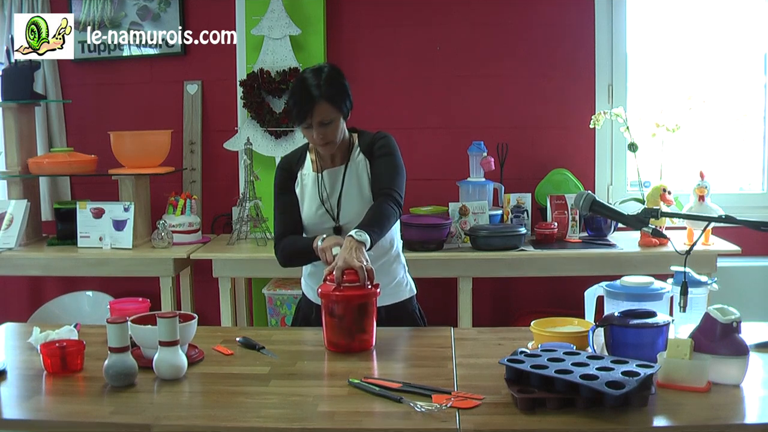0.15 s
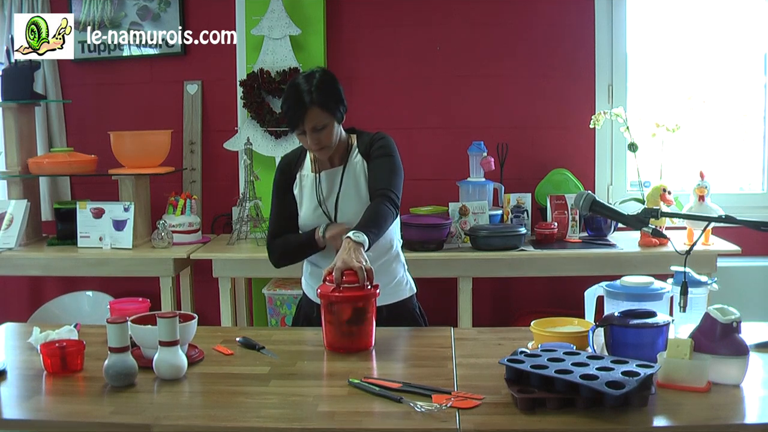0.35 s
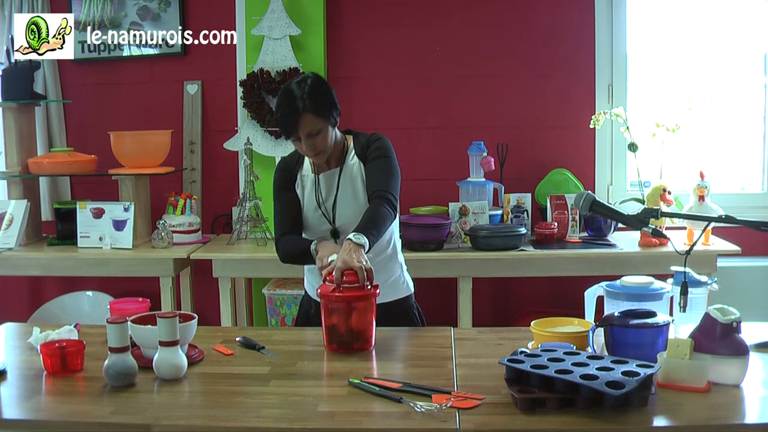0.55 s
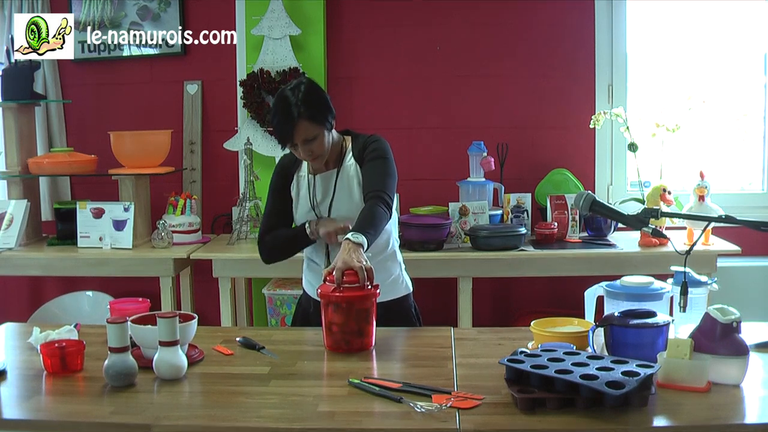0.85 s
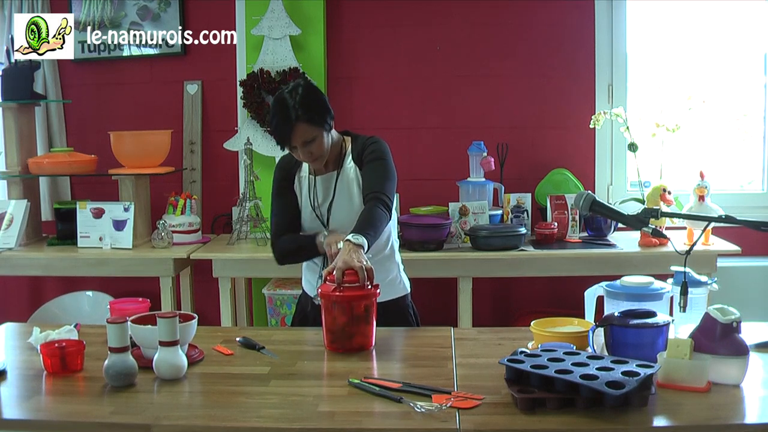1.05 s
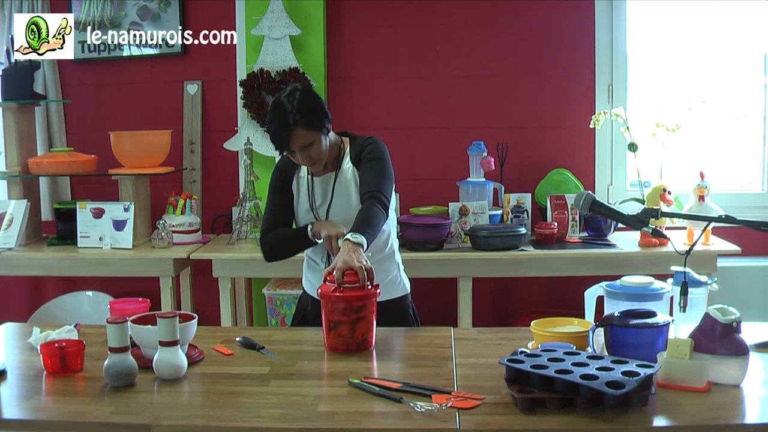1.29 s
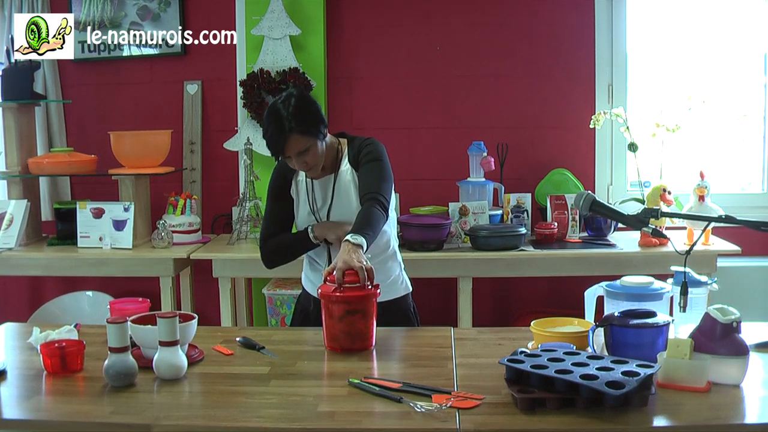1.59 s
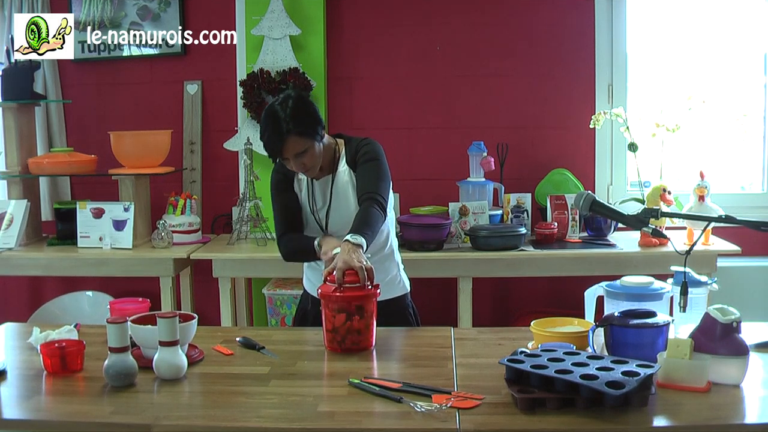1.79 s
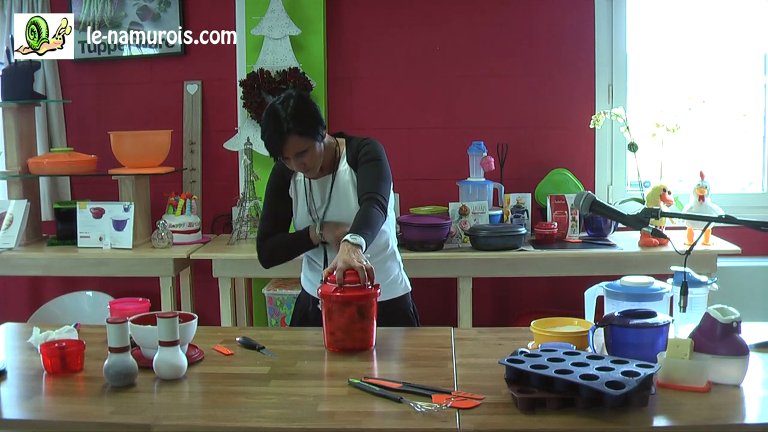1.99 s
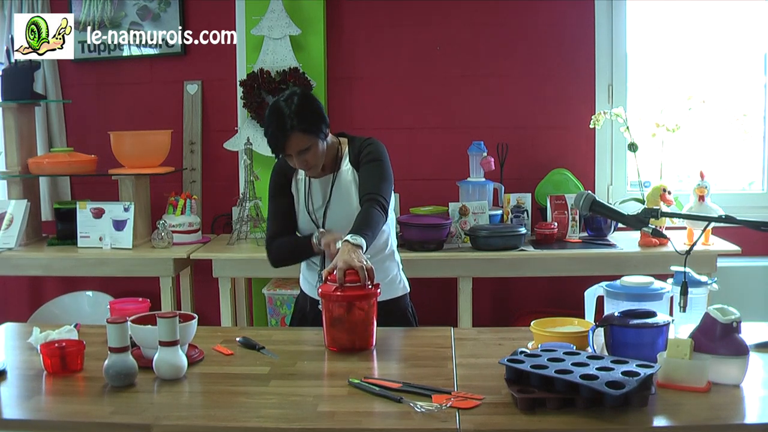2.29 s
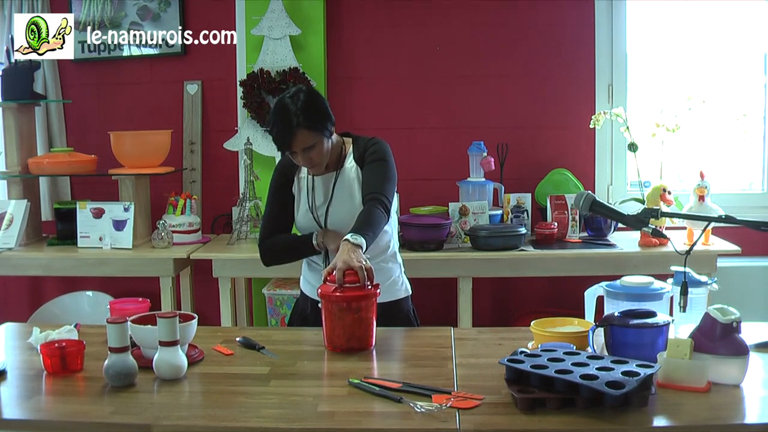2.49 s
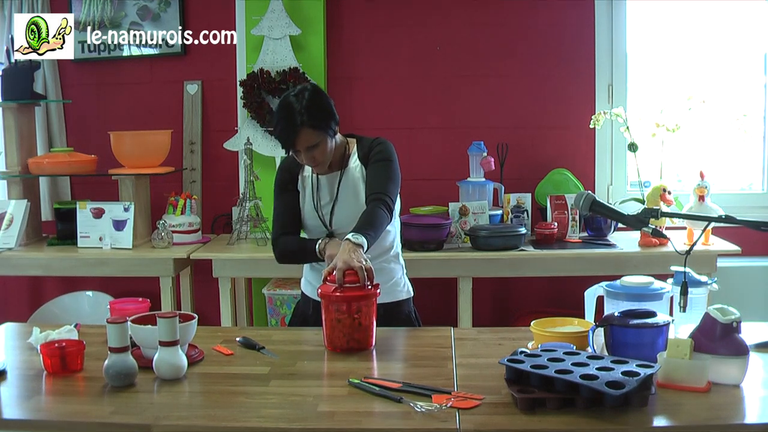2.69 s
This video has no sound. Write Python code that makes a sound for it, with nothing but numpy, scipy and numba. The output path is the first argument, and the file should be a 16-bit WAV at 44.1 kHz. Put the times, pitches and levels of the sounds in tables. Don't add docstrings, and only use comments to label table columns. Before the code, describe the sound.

A hand-pulled food chopper is tugged quickly about seven times; vegetable pieces drum on the plastic bowl, the spring ratchet rattles the cord back and the handle clacks, in a hard, echoing room a few metres away.

```python
import sys
import numpy as np
from scipy import signal
from scipy.io import wavfile
from scipy.ndimage import uniform_filter1d
from numba import njit

SR = 44100
rng = np.random.default_rng(int(sys.argv[2]) if len(sys.argv) > 2 else 0)


def undo_db(level):
    steps = np.asarray(level, float) / 20
    return 10 ** steps


def file_out(sig):
    cols = np.atleast_2d(sig).T
    lim = np.clip(cols, -1, 1)
    pcm = np.round(lim * 32767).astype(np.int16)
    wavfile.write(sys.argv[1], SR, pcm)


N = 125685

# (start [s], fastest [s], end [s])
PULL_TIMES = [(.158, .17, .24), (.25, .37, .51), (.695, .81, .885), (1.12, 1.2, 1.283), (1.558, 1.63, 1.71),
              (1.948, 2.03, 2.1), (2.345, 2.425, 2.495)]
# (level [dB], brightness [dB per octave], drum pitch [Hz], drum level [dB], rim level [dB])
PULL_SOUNDS = [
    (-30.5, 0.6, 400, -40, -55),
    (-24.5, 0.8, 420, -36, -46),
    (-24.5, 1.9, 600, -34, -41),
    (-25.5, 1.9, 660, -36, -41),
    (-25.5, 0.9, 700, -33, -39),
    (-26.5, -1.5, 600, -34, -42),
    (-29.5, -0.9, 830, -28, -38),
]
# (start [s], fastest [s], end [s])
REWIND_TIMES = [(.497, .57, .665), (.902, .97, 1.085), (1.289, 1.3, 1.375), (1.362, 1.41, 1.51),
                (1.72, 1.78, 1.9), (2.119, 2.19, 2.3), (2.522, 2.535, 2.625), (2.6, 2.77, 2.95),
                (.12, .14, .17), (-.1, .01, .09)]
# (level [dB], loose pieces [dB], rattle pitch [Hz], rattle level [dB], sizzle [dB])
REWIND_SOUNDS = [
    (-35.5, 2, 1800, -44, -7),
    (-30, -5, 1400, -38, 0),
    (-34, -5.5, 1300, -41, 1),
    (-32, -4.5, 1900, -40, -1),
    (-30.5, -3, 1300, -35, 1),
    (-30.5, -5.5, 2050, -37, 2),
    (-40.5, -12, 4950, -41, -1),
    (-53.5, 3.5, 1300, -58, -10),
    (-50.5, 3, 2000, -50, -10),
    (-60.5, 4, 400, -62, 0),
]
PULL_RISE, PULL_FALL = 0.28, 0.5
HITS_PER_S = 700


def level(x, db):
    return x * undo_db(db) / np.sqrt(np.mean(x ** 2))


def peak(x):
    return x / np.abs(x).max()


def place(out, s, db, x):
    start = int(s * SR)
    out[start:start + len(x)] += undo_db(db) * x


def butter(x, order, hz, kind):
    return signal.sosfilt(signal.butter(order, hz, kind, fs=SR, output="sos"), x)


def band(x, hz, width):
    return signal.lfilter(*signal.iirpeak(min(hz, .45 * SR), hz / width, fs=SR), x)


def moving(x, hz, width):
    turn = np.exp(2j * np.pi * np.cumsum(hz * np.ones(N)) / SR)
    centred = butter(x / turn, 2, width / 2, "low")
    return level((centred * turn).real, 0)


def ring(x, hz, t60):
    p = np.exp(2j * np.pi * hz / SR - np.log(1000) / (t60 * SR))
    return signal.lfilter([1], [1, -p], x).imag


def read(table, hz):
    table_hz, table_db = np.transpose(table)
    return np.interp(np.log(hz), np.log(table_hz), table_db)


def walk(rate):
    k = int(SR / rate)
    steps = np.repeat(rng.standard_normal(N // k + 1), k)
    return 1.3 * uniform_filter1d(uniform_filter1d(steps, k), k)[:N]


def clicks(rate, spread_db):
    when, side, size = rng.random((3, N))
    strength = np.sign(side - .5) * undo_db(-spread_db * np.log(size + .03))
    return level((when < rate / SR) * strength, 0)


def swell(start, top, end, rise, fall):
    t = np.arange(N) / SR
    up, down = (t - start) / (top - start), (end - t) / (end - top)
    return np.where(t < top, np.clip(up, 0, 1) ** rise, np.clip(down, 0, 1) ** fall)


def grains(colour, body, body_db, rate, spread_db):
    shared = undo_db(-1.5) * clicks(rate / 4, spread_db)
    half = 2 ** .25
    out = []
    for hz in 170 * 2 ** np.arange(0, 6, .5):
        hit = shared + clicks(rate * (hz / 1000) ** .5, spread_db)
        near = 0
        for f, width, db in body:
            if 1 / half <= f / hz < half:
                near = near + undo_db(db) * band(band(hit, f, 1.5 * width), f, 1.5 * width)
        direct = butter(hit, 2, [hz / half, hz * half], "band")
        out.append((hz, undo_db(read(colour, hz)) * direct + undo_db(body_db) * near))
    return out


def pulls():
    # (frequency [Hz], density [dB per Hz])
    pieces = [(59, -53), (100, -21.5), (508, 1), (1110, -15), (1420, -4), (4440, -19), (7100, -38.5),
              (7500, -63), (9750, -93), (16500, -120)]
    # (frequency [Hz], width [Hz], level [dB])
    bowl = [(256, 130, -6), (396.5, 88, 1.5), (802, 384, 2.5), (1410, 350, -14), (2458, 310, -7.5)]
    speed_bright = 0.28
    finer_db_per_s, ringier_db_per_s = -5, 2.5
    surge = undo_db(1.5 * walk(45))
    t = np.arange(N) / SR - 1.2
    strokes = []
    for span, (db, tilt_db, *_) in zip(PULL_TIMES, PULL_SOUNDS):
        strokes.append((swell(*span, PULL_RISE, PULL_FALL), db, tilt_db))
    parts = grains(pieces, bowl, -5 + ringier_db_per_s * t, HITS_PER_S, 4.5)
    out = 0
    for hz, grain in parts:
        octaves = np.log2(hz / 700)
        steepness = 1 + speed_bright * max(octaves, 0)
        drive = sum(speed ** steepness * undo_db(db + tilt_db * octaves) for speed, db, tilt_db in strokes)
        out = out + grain * drive * undo_db(finer_db_per_s * t * max(-octaves, 0))
    return out * surge / np.std(sum(grain for _, grain in parts))


def drums():
    drum_glide, rattle_wander = .25, .1
    hits, ticks, wander = clicks(HITS_PER_S, 3.5), clicks(400, 4.5), walk(15)
    rim = moving(ticks, 2420 * (1 + .03 * wander), 280)
    out = 0
    for span, (_, _, hz, db, rim_db) in zip(PULL_TIMES, PULL_SOUNDS):
        speed = swell(*span, PULL_RISE, PULL_FALL)
        drum = moving(hits, hz * (1 + drum_glide * (speed - 1)), 240)
        out = out + speed * (undo_db(db) * drum + undo_db(rim_db) * rim)
    for span, (_, _, hz, db, _) in zip(REWIND_TIMES, REWIND_SOUNDS):
        rattle = moving(ticks, hz * (1 + rattle_wander * wander), 400)
        out = out + swell(*span, .6, .5) * undo_db(db) * rattle
    return out


def rewinds():
    # (frequency [Hz], density [dB per Hz])
    ratchet = [(88, -40), (150, -27.5), (480, 2.5), (613, -21.5), (687, -4), (837, -1), (3650, -3),
               (7500, -13), (9750, -46), (16500, -120)]
    # (frequency [Hz], width [Hz], level [dB])
    lid = [(1330, 240, -4), (1940, 89, -2), (3620, 220, 0.5), (4990, 520, -2), (6060, 500, -12.5)]
    sizzle_hz = 5700
    parts = grains(ratchet, lid, -3, 900, 4.5)
    high = sum(grain for hz, grain in parts if hz > 2000)
    low = sum(grain for hz, grain in parts if hz < 2000)
    fast, loose, sizzle = 0, 0, 0
    for span, (db, loose_db, _, _, sizzle_db) in zip(REWIND_TIMES, REWIND_SOUNDS):
        speed = swell(*span, 0.2, 0.66)
        fast = fast + undo_db(db) * speed
        sizzle = sizzle + undo_db(db + sizzle_db) * speed
        loose = loose + undo_db(db + loose_db + 3) * swell(*span, 1, 1.73)
    top = butter(high, 5, sizzle_hz, "high")
    body = butter(high, 5, sizzle_hz, "low")
    mix = fast * (body + undo_db(-11) * low) + sizzle * top + loose * low
    return mix * undo_db(3 * walk(70)) / np.std(high)


def coast():
    whisper = band(clicks(500, 3.5), 5500, 400)
    return level(whisper, -49) * swell(2.56, 2.76, 3.05, .4, 1.0)


def clacks():
    # (time [s], peak [dB], treble edge [dB])
    clack_list = [(0.181, -6.5, -28), (0.2533, -21, -16.5), (0.2644, -22.5, -22), (0.4289, -18, -34.5),
                  (0.5058, -20, -32.5), (0.6709, -8, -20), (0.9028, -13, -24), (0.9632, -11, -19),
                  (1.0933, -11.5, -10), (1.1468, -10.5, -18), (1.2905, -15.5, -18), (1.3758, -14, -15),
                  (1.4925, -19.5, -13), (1.513, -12, -15), (1.7434, -20, -11.5), (1.9045, -8.5, -12.5),
                  (2.1206, -22, 0.5), (2.3094, -23, 3.5), (2.5301, -16, -10), (2.5664, -24, -0.5),
                  (2.7472, -32, -12)]
    # (frequency [Hz], level [dB], t60 [s])
    clack_modes = [(1975, -2, 0.014), (3594, -1.5, 0.015), (2700, -0.5, 0.0065), (1410, -16, 0.011)]
    rattle_s, split_hz = 0.0069, 5040
    t = np.arange(3000) / SR
    envelope = np.exp(-(t / rattle_s) ** 2) * (1 - np.exp(-t / 0.0012))
    out = np.zeros(N + SR)
    for s, db, top_db in clack_list:
        tick = rng.standard_normal(len(t)) * envelope
        modes = 0
        for f, d, t60 in clack_modes:
            chance = rng.standard_normal()
            modes = modes + undo_db(d + 1.2 * chance) * ring(tick, f * (1 + .03 * chance), t60)
        crack = peak(band(tick, 3000, 3500))
        body = peak(butter(0.6 * peak(modes) + crack, 4, split_hz, "low"))
        body = butter(body, 2, 1100, "high")
        edge = peak(butter(tick, 4, split_hz, "high"))
        place(out, s, db, undo_db(-5.5) * body + undo_db(top_db + 7) * edge)
    return out[:N]


def spikes():
    # (time [s], level [dB])
    spike_list = [(0.182, -53), (0.3765, -60), (0.6724, -68), (0.7537, -67), (0.7916, -68), (0.9632, -56),
                  (1.1468, -55), (1.6387, -63), (1.7724, -64), (1.9081, -54), (2.4239, -69)]
    out = np.zeros(N)
    for s, db in spike_list:
        out[int((s + .001) * SR)] = -undo_db(db + 21)
    return signal.sosfilt(signal.ellip(8, .2, 60, [3000, 10000], "band", fs=SR, output="sos"), out)


def knocks():
    # (time [s], peak [dB], pitch [Hz])
    knock_list = [(0.165, -12, 382), (0.302, -22, 390), (0.315, -15, 420), (0.376, -13.5, 563),
                  (0.757, -17, 633), (0.789, -16, 643), (0.84, -11, 2490), (0.856, -15.5, 425),
                  (1.565, -15.5, 714), (1.955, -20.5, 570), (2.358, -17.5, 627)]
    t60_s = 0.048
    out, t = np.zeros(N + SR), np.arange(SR) / SR
    for s, db, hz in knock_list:
        knock = 0
        for ratio, d in [(.6, -6.5), (1, 4), (1.7, -7)]:
            knock = knock + undo_db(d) * np.sin(2 * np.pi * hz * ratio * t) * 1000 ** (-t * ratio / t60_s)
        place(out, s, db - 6, peak(knock))
    return out[:N]


def thumps():
    # (time [s], level [dB])
    thump_list = [
        (.34, -54.5),
        (0.448, -31),
        (.72, -51.5),
        (0.838, -47),
        (1.991, -52),
        (2.37, -60.5),
    ]
    table_hz, t60_s, rise_s = 97, .5, .02
    out, t = np.zeros(N + SR), np.arange(SR) / SR
    boom = np.sin(2 * np.pi * table_hz * t) * 1000 ** (-t / t60_s) * (1 - np.exp(-t / rise_s))
    for s, db in thump_list:
        place(out, s, db, boom)
    return out[:N]


def taps():
    # (time [s], peak [dB], pitch [Hz])
    lid_taps = [(0.1261, -36, 2350), (0.1471, -28, 1640), (0.3326, -22, 1630), (0.3456, -19, 1530),
                (0.5217, -20, 3580), (0.7617, -17, 2410), (0.7896, -16, 1470), (0.8564, -14, 1350),
                (0.9433, -15, 3580), (0.9714, -16, 3530), (0.9894, -19, 3630), (1.067, -28, 2820),
                (1.2074, -17, 1400), (1.2324, -17, 2670), (1.2974, -21, 1410), (1.3528, -20, 3520),
                (1.4122, -18, 3350), (1.4341, -21, 1920), (1.4604, -18, 1970), (1.5878, -19, 1410),
                (1.7679, -16, 1350), (1.8294, -20, 1330), (1.9914, -19, 2020), (2.0178, -23, 1890),
                (2.1321, -19, 3580), (2.1874, -19, 4790), (2.2204, -20, 2090), (2.2744, -27, 2110),
                (2.4029, -24, 2330), (2.5864, -32, 5000)]
    # (time [s], peak [dB], pitch [Hz])
    wall_taps = [(0.441, -19, 576), (0.713, -18, 573), (1.128, -21, 643), (1.175, -20, 630),
                 (1.638, -17, 511), (2.142, -26, 1280), (2.169, -21, 689), (2.379, -16, 724),
                 (2.411, -16, 781), (2.423, -15, 700)]
    decay_s, q = .004, 2.2
    out, t = np.zeros(N + SR), np.arange(1500) / SR
    for s, db, hz in lid_taps + wall_taps:
        burst = rng.standard_normal(len(t)) * np.exp(-t / decay_s)
        place(out, s, db - 4, peak(band(burst, hz, hz / q)))
    return out[:N]


def freewheel():
    # (time [s], peak [dB])
    tick_list = [(2.6567, -33), (2.6836, -34), (2.7166, -35), (2.747, -33), (2.7565, -31), (2.7739, -30),
                 (2.8273, -34)]
    # (frequency [Hz], level [dB], t60 [s])
    tick_modes = [(1960, -4, .015), (3620, -3, .012), (5400, -1, .012)]
    out, t = np.zeros(N + SR), np.arange(1500) / SR
    for s, db in tick_list:
        burst = rng.standard_normal(len(t)) * np.exp(-t / .001)
        tick = sum(undo_db(d) * ring(burst, f, t60) for f, d, t60 in tick_modes)
        place(out, s, db - 3, peak(tick))
    return out[:N]


@njit
def walls(x, lags, gain, damp, share):
    n = len(lags)
    line, soft, out = np.zeros((n, 8192)), np.zeros(n), np.zeros(len(x))
    for i in range(len(x)):
        total = 0.
        for k in range(n):
            soft[k] += (1 - damp) * (gain[k] * line[k, (i - lags[k]) & 8191] - soft[k])
            total += soft[k]
        out[i] = total
        for k in range(n):
            line[k, i & 8191] = x[i] + soft[k] - total * share + 1e-18
    return out


def hum():
    # (frequency [Hz], density [dB per Hz])
    room_tone = [(24, -33), (40, -17.5), (179, -3), (363, 10), (2270, -14), (4800, -26.5), (5850, -21),
                 (7790, -24), (10100, -50), (17100, -120)]
    tone = 0
    for hz in 110 * 2 ** np.arange(0, 6.3, .5):
        flicker = undo_db(read(room_tone, hz) + 2.6 * walk(8))
        tone = tone + flicker * band(rng.standard_normal(N), hz, hz / 3)
    return level(tone, -51.5) + level(band(rng.standard_normal(N), 98, 10), -70)


def thrift(x):
    thrift_hz, thrift_db, db_per_khz = 4170, -44.5, 3.5
    whim_db, dropped_db = 5, -34
    window = np.sin(np.pi * (np.arange(2048) + .5) / 2048)
    hz, _, z = signal.stft(x, SR, window=window, nperseg=2048)
    hz = hz[:, None]
    power = uniform_filter1d(np.abs(z) ** 2, size=5, axis=0)
    limit = power.sum(axis=0) * undo_db(2 * (thrift_db + db_per_khz * (hz - thrift_hz) / 1000))
    strips = np.kron(rng.standard_normal((129, z.shape[1])), np.ones((8, 2)))
    limit = limit * undo_db(2 * whim_db * strips[:len(hz), :z.shape[1]])
    margin_db = 10 * np.log10(power / limit + 1e-12)
    margin_db = margin_db + np.clip(thrift_hz - hz, 0, None) / 40
    keep = undo_db(dropped_db / (1 + np.exp(np.clip(margin_db, -30, 30))))
    return signal.istft(z * keep, SR, window=window, nperseg=2048)[1][:N]


def scene():
    flutter_s, flutter_db, flutter_damp = 0.016, -10, 0.15
    room_t60_s, room_db, room_damp = 0.39, -17, 0.27
    dry = pulls() + drums() + rewinds() + coast() + clacks() + knocks() + thumps() + taps() + freewheel()
    flutter = walls(dry, np.array([int(flutter_s * SR)]), np.array([undo_db(flutter_db)]), flutter_damp, 0.)
    lags = rng.integers(600, 2400, size=8)
    tail = walls(dry, lags, undo_db(-60 * lags / SR / room_t60_s), room_damp, 2 / len(lags))
    return (undo_db(-0.09) * (dry + flutter) + undo_db(room_db) * tail + hum())[None]


def top_cut(x):
    return signal.sosfilt(signal.butter(12, 10400, fs=SR, output="sos"), x)


def record(dry):
    low_hz, top_hz, hiss_db = 96, 7543, -69.5
    x = signal.sosfilt(signal.cheby1(N=5, rp=.5, Wn=low_hz, btype="high", fs=SR, output="sos"), dry[0])
    x = np.tanh(2.5 * x) / 2.5
    x = thrift(x) + undo_db(hiss_db) * rng.standard_normal(N)
    x = signal.sosfilt(signal.ellip(10, .2, 55, top_hz, fs=SR, output="sos"), x)
    mix = x + spikes()
    return top_cut(mix[None])


dry = scene()
out = record(dry)
file_out(out)
```